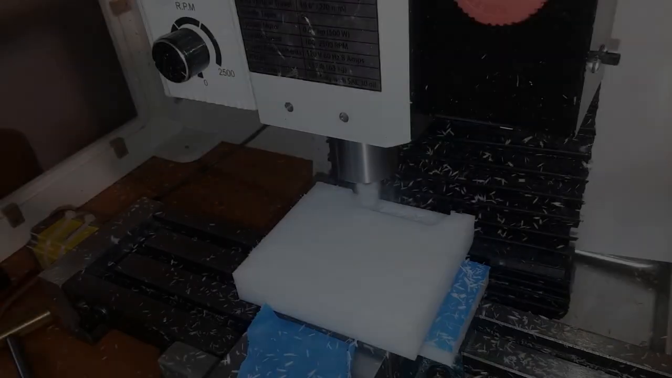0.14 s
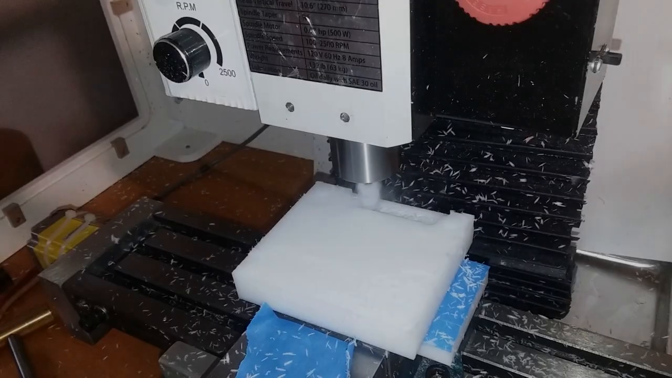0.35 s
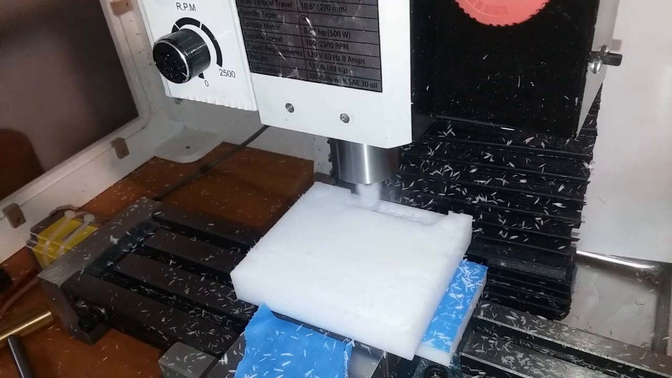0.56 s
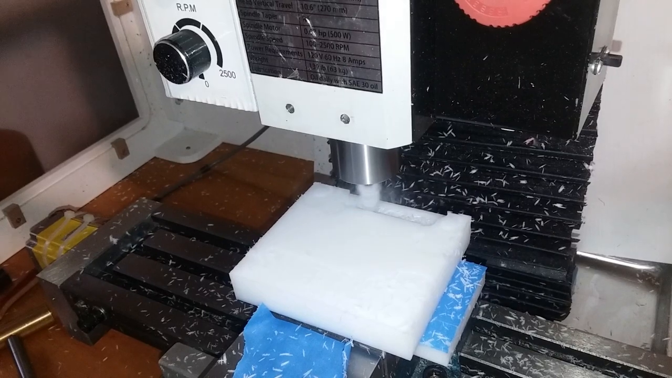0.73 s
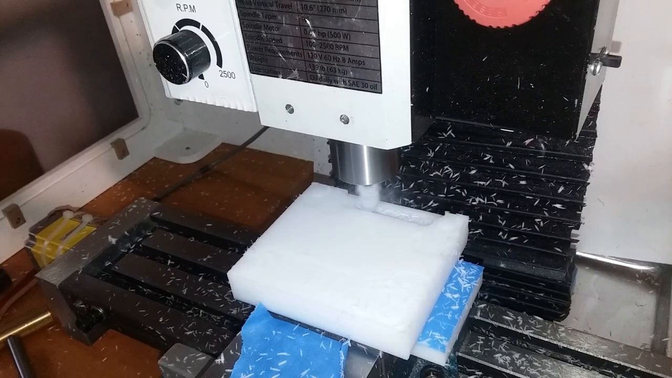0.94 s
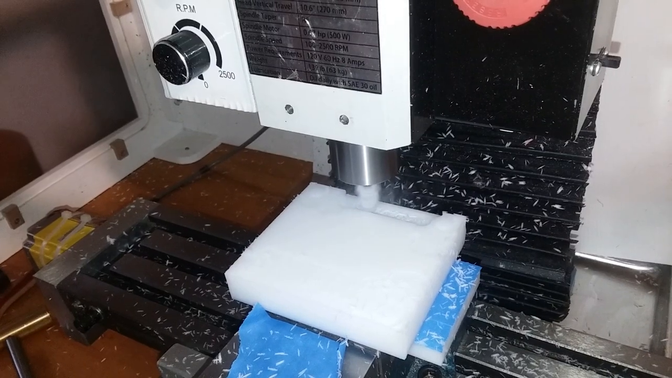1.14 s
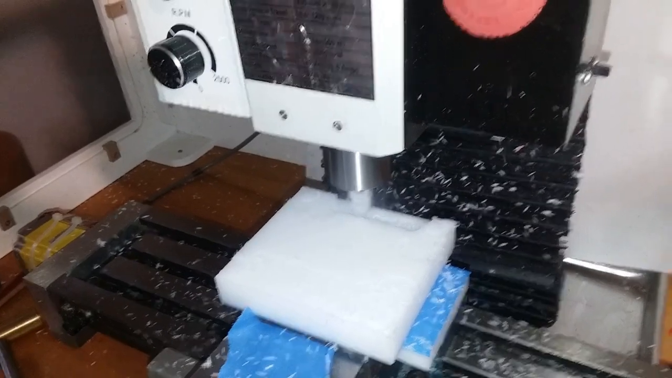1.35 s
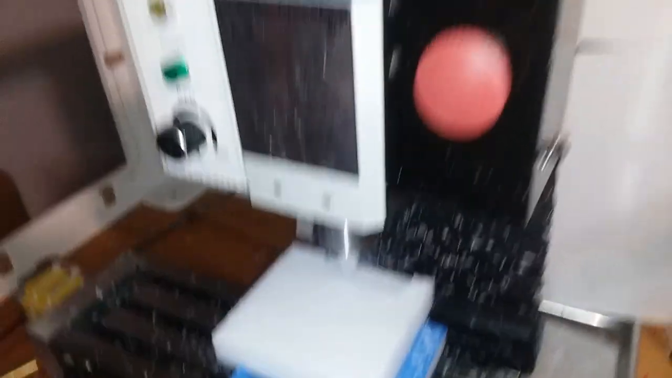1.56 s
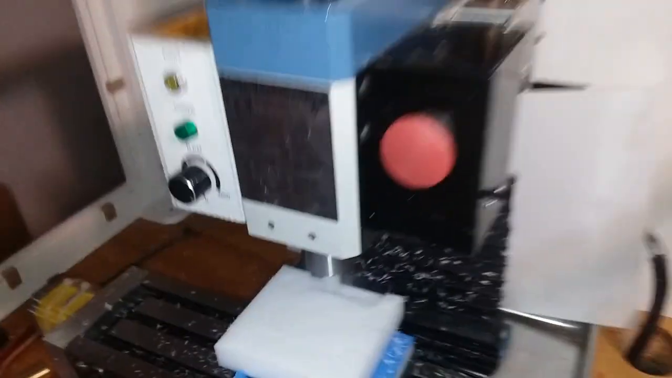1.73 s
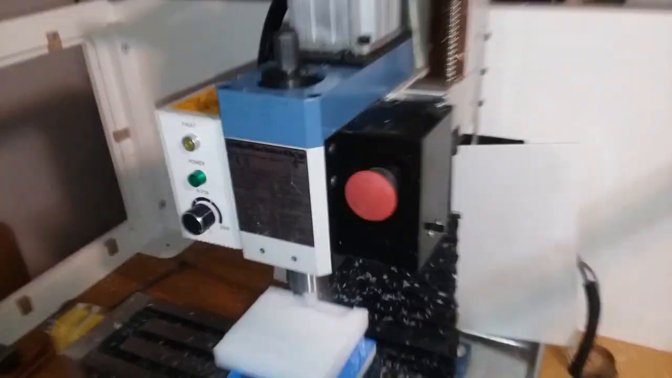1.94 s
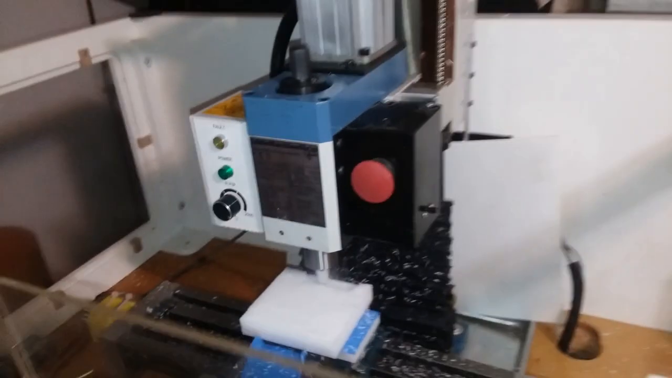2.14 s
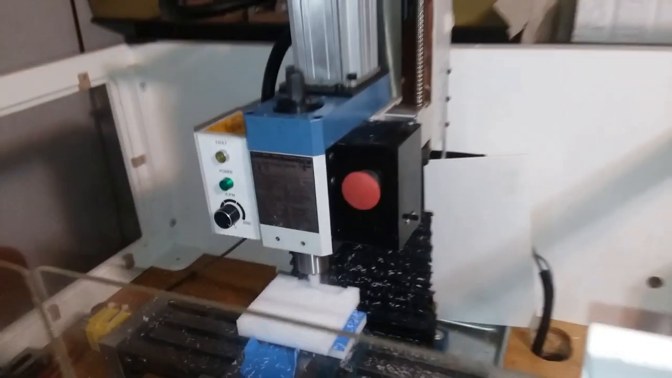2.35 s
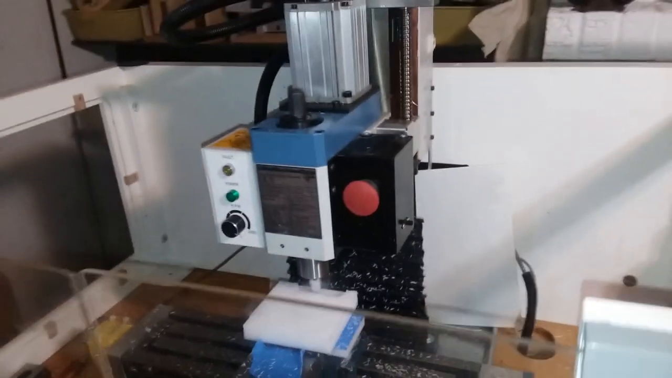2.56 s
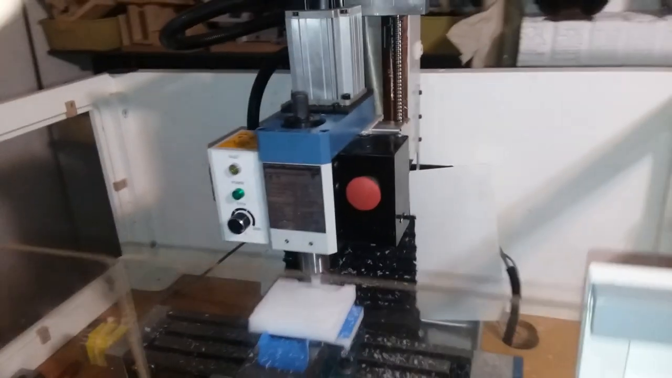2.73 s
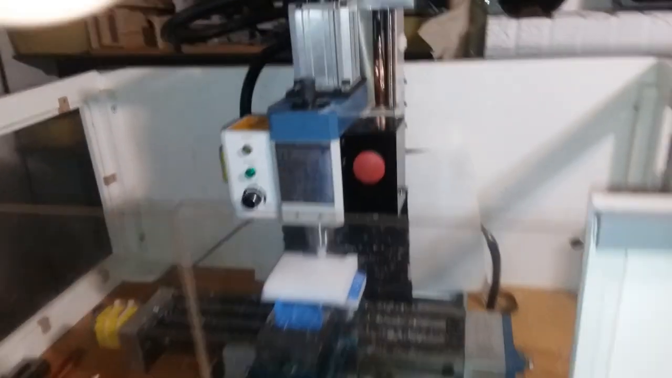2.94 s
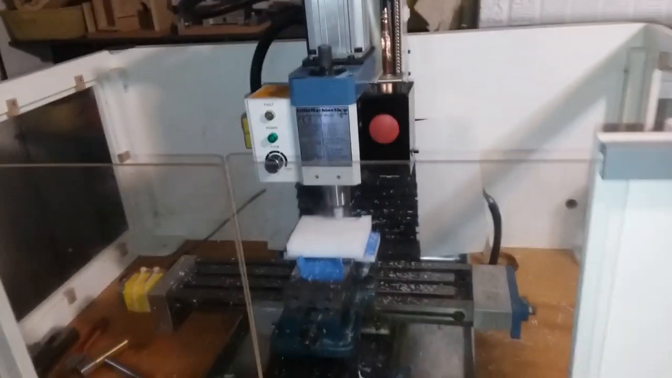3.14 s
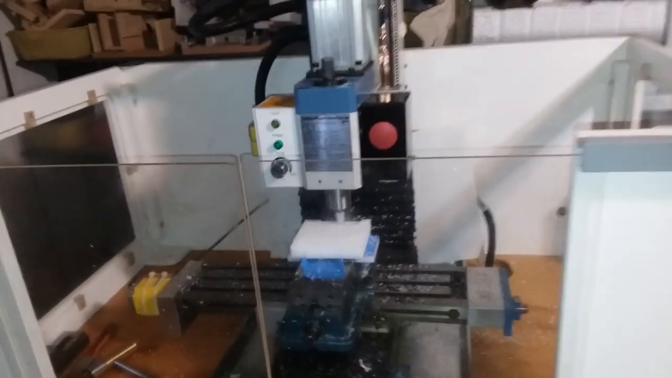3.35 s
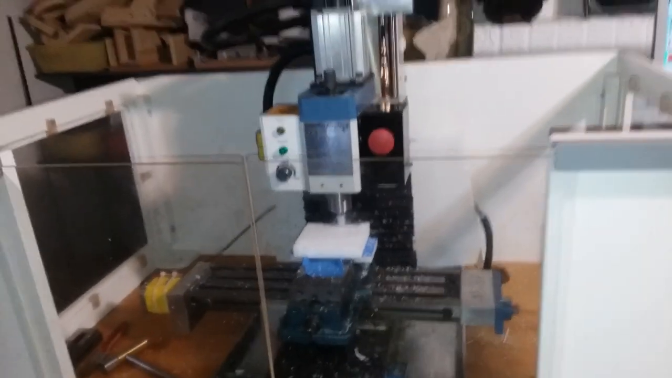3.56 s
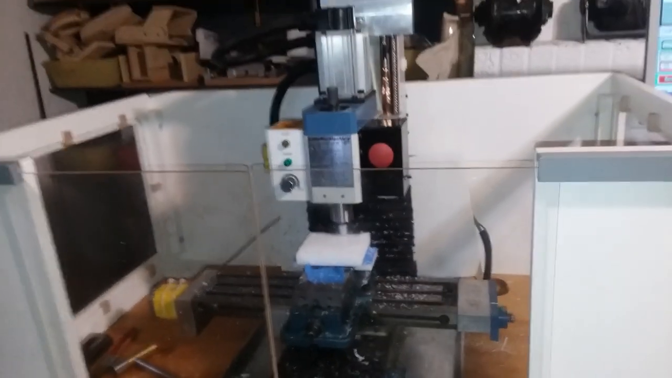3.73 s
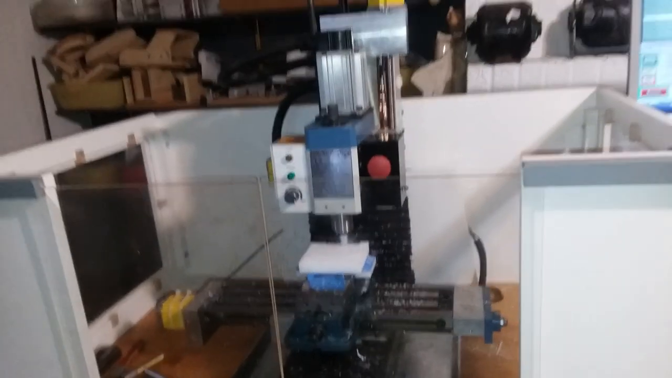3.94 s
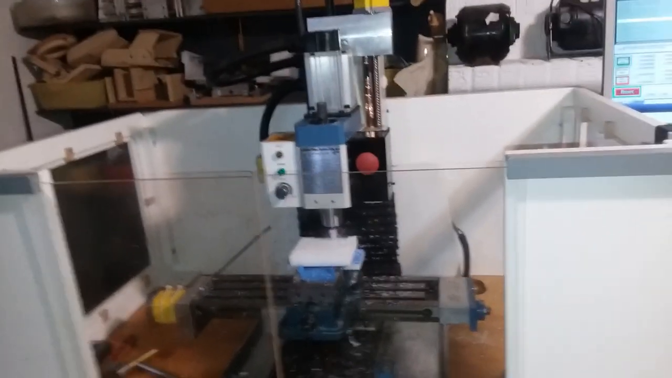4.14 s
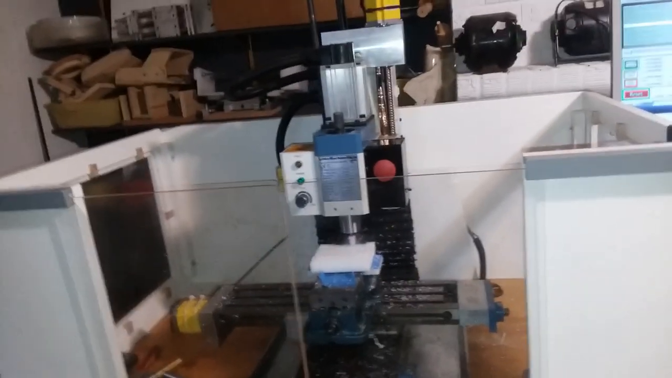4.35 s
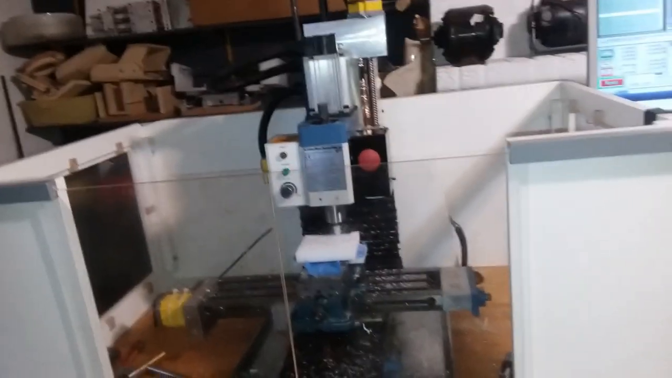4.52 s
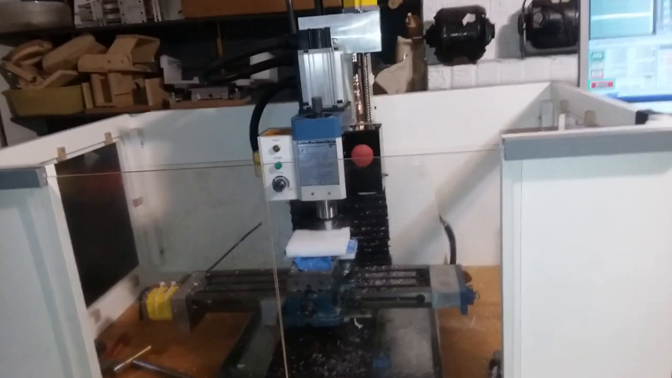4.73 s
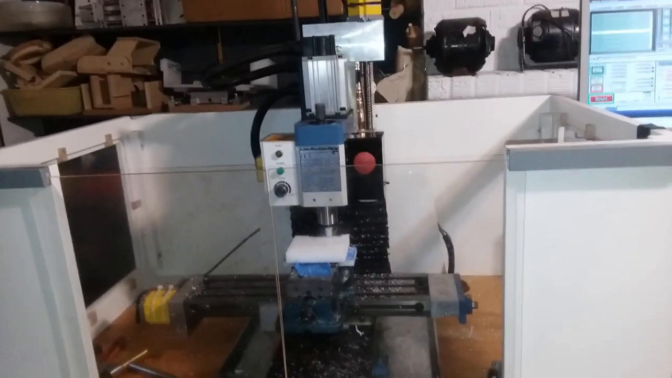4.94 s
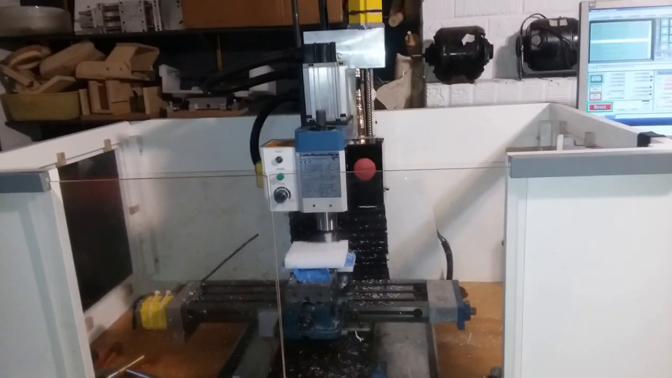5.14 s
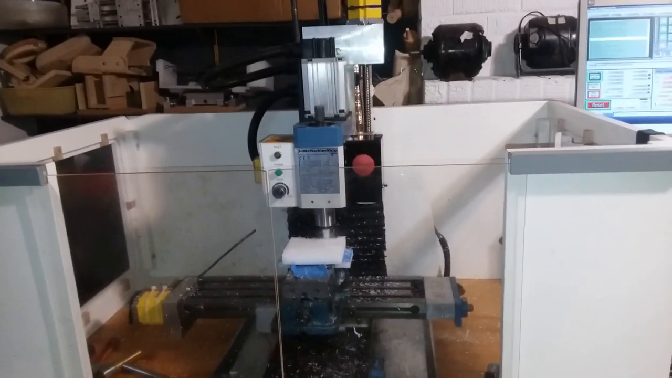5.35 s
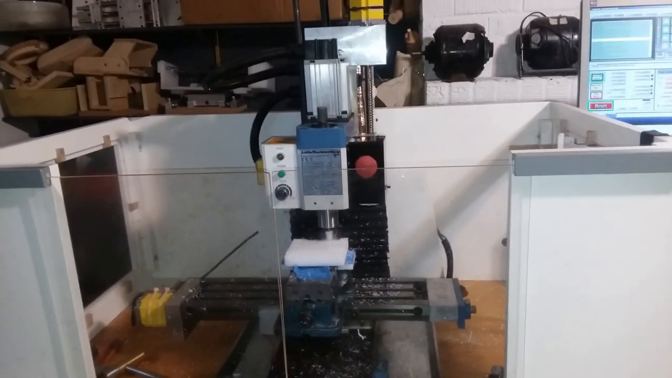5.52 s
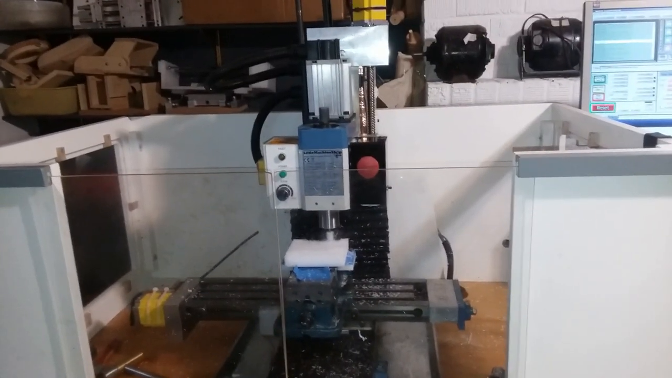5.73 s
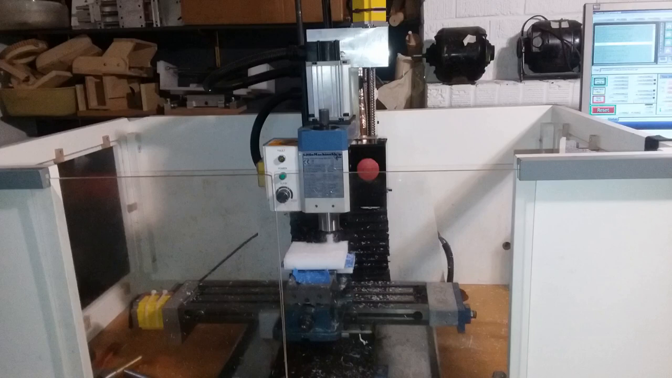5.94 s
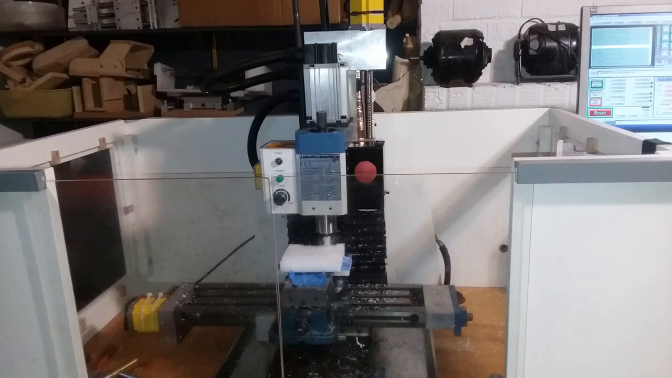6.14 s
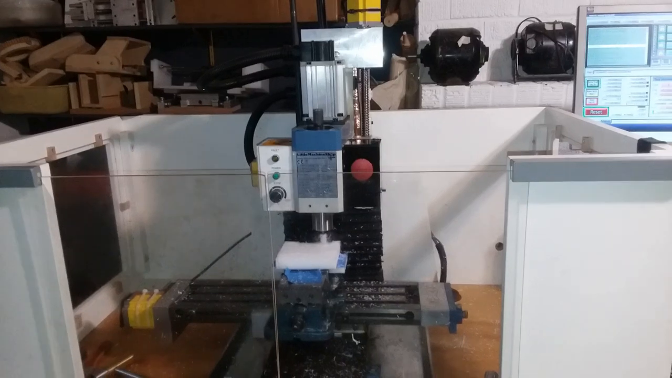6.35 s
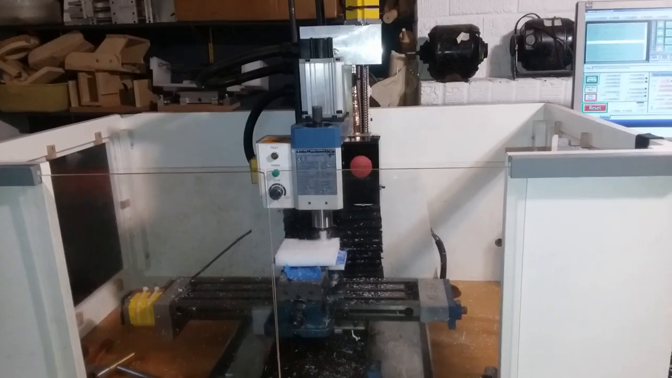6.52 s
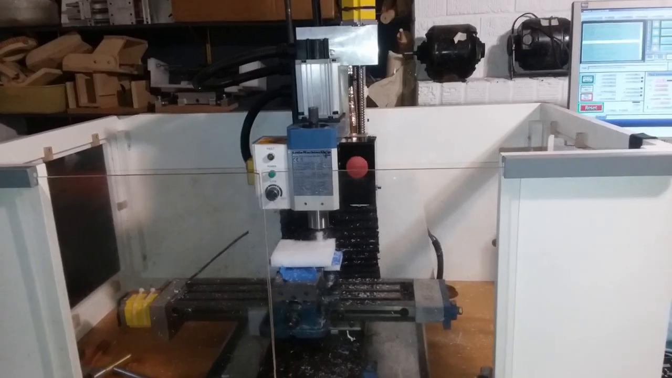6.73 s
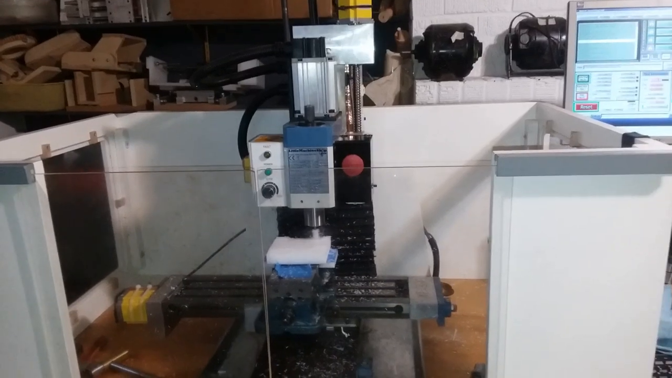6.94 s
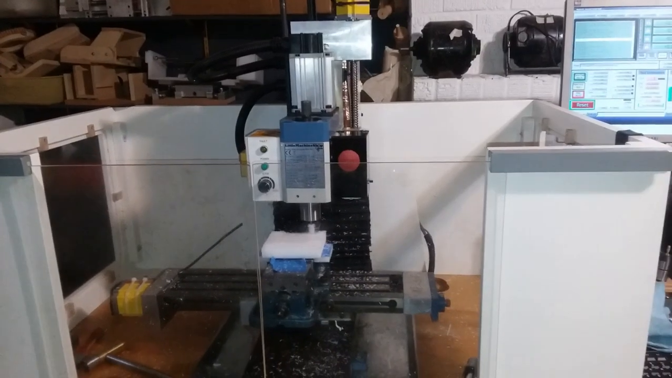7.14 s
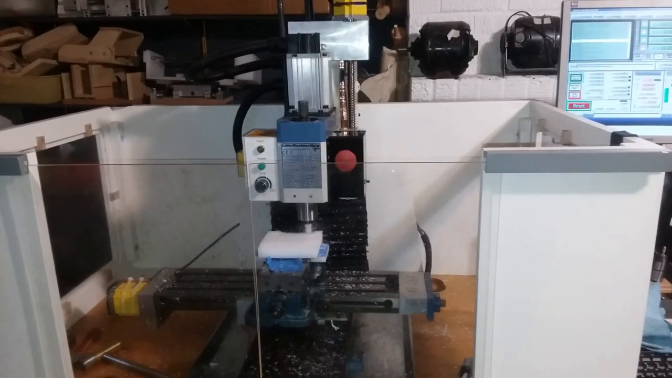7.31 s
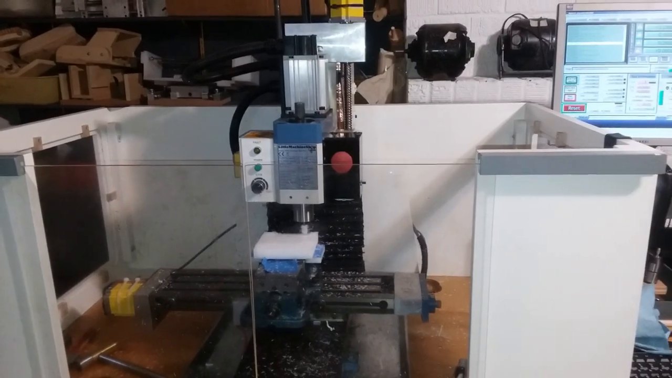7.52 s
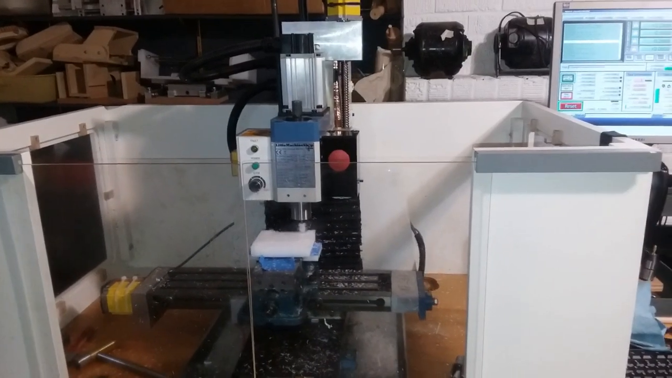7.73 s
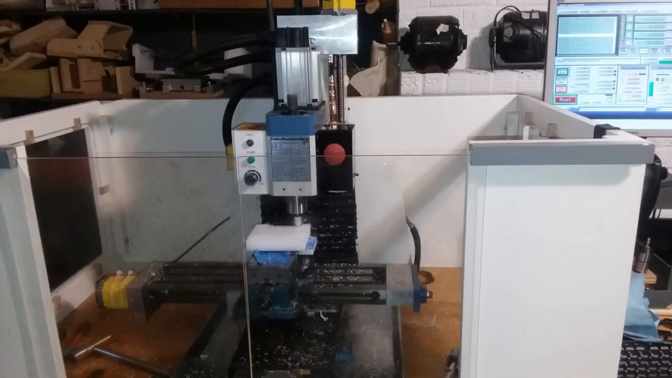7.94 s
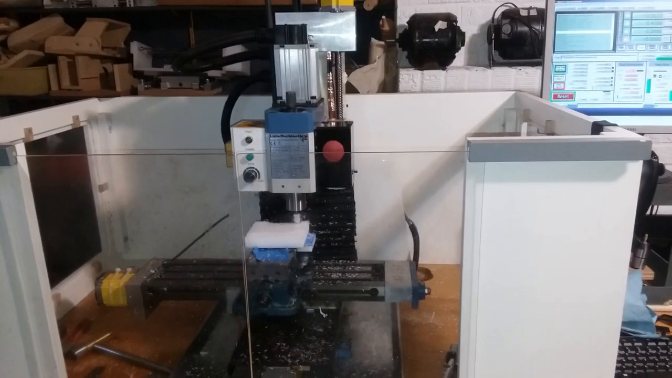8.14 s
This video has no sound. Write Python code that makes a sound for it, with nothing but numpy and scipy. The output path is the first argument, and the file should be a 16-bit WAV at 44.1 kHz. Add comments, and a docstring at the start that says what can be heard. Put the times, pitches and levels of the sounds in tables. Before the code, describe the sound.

A benchtop mill runs without a pause in a workshop, its motor whine constant in pitch with only a tiny waver. It begins close, strong and raspy, with hissing cutter noise. As the wide stereo microphone retreats past the enclosure, individual overtones swell and fade, and everything becomes thinner and softer. A very high faint electronic whistle persists, and the last second gains deep frame rumble.

```python
"""The geared motor of a benchtop milling machine whines as the machine cuts plastic.
Its whine is a series of multiples of one pitch; the spindle hums at 2500 rpm from the same turning angle.
Gear tones and shaped noise add rumble, rasp and hiss, and the drive electronics whistle very high.
The microphone starts beside the cutter, then backs out of the enclosure; near the end the hum swells."""
import sys
import numpy as np
from scipy import signal
from scipy.fft import rfft, irfft, next_fast_len
from scipy.io import wavfile
from scipy.ndimage import map_coordinates

SR = 44100
rng = np.random.default_rng(int(sys.argv[2]) if len(sys.argv) > 2 else 0)


def int16_out(signal):
    """Quantize to a 16-bit WAV file."""
    q = np.round(np.clip(np.atleast_2d(signal).T, -1, 1) * 32767)
    wavfile.write(sys.argv[1], SR, q.astype(np.int16))


N = 360736

# Levels in the tables come before the small trims added in the functions.
# "Cutter, door, room" are the microphone's three places, numbered 0, 1, 2.

# set motor speed, sagging a little as the cut goes on: t/s, f/Hz
SET_SPEED = [(0, 264.7), (4.5, 264.7), (8.18, 264.0)]
# the speed controller hunts: swings a second, swing either way, and typical size of an irregular wander
HUNT_PER_S, HUNT_HZ, WANDER_HZ = 1.98, 0.45, 0.35
# spindle turns for each cycle of the whine's base pitch
SPINDLE_SHARE = 41.68 / 264.4
# microphone path: t/s, place (beyond 0 or 2 the tone levels stay put)
MIC_PATH = [(0, 0), (1.4, -0.26), (1.8, 0.64), (2.2, 0.7), (3.4, 1.18), (3.8, 1.7), (4.5, 2.5),
            (8.18, 2.03)]
# clear whines: multiple, level/dB at cutter, door, room, t/s of one standing-wave node,
# time from node to node/s, share of the lean (0-1)
CLEAR_WHINES = [(3, -44.5, -48, -45.5, 3.17, 2.3, 0.07), (4, -40, -45.5, -52.5, 2.32, 0.67, 0.16),
                (5, -24.5, -30, -32.5, 2.23, 0.57, 0.8), (7, -19.7, -29, -38, 1.82, 0.586, 0.46),
                (8, -30.5, -29.5, -35, 2.15, .43, 0.8), (10, -30, -32, -34.5, 2.33, 1.35, .75),
                (12, -36.5, -50.5, -42, 2.67, 1.9, 1), (14, -37, -45, -43.5, 2.44, 1.6, 1)]
# weaker whines: multiple, level/dB at cutter, door, room
WEAK_WHINES = [(2, -49.5, -55.4, -53.8), (6, -36.4, -44.2, -45.4), (9, -32.6, -35.9, -40.1),
               (11, -51.6, -59.3, -56.1), (13, -51.9, -59.5, -57.1), (15, -40.7, -51.0, -48.9),
               (16, -46.2, -55.4, -50.5), (17, -46.5, -52.9, -52.3), (19, -48.3, -57.3, -55.8),
               (20, -50.8, -59.2, -60.6), (21, -47.6, -55.5, -62.2)]
# pull of the clear whines to the left (negative: right): t/s, strength (squashed later, not dB)
WHINE_LEAN = [(0, -1), (1.7, -4), (2.6, -2), (3.2, 13), (5, 11), (6.7, 13), (8.18, 5)]
# the walk backwards crosses the enclosure's standing waves: t/s, depth of their pattern (0-1)
STANDING_DEPTH = [(1.45, 0), (1.8, 0.7), (2.4, 0.5), (3.3, 0.17), (4.4, 0), (4.8, 0.06)]
# spots on the way where one whine rings out: t/s of the middle, multiple,
# time from the middle until the gain has shrunk to 37 percent/s, gain/dB
WHINE_SWELLS = [(1.787, 10, 0.093, 5.5), (1.81, 12, 0.1, 11), (1.914, 5, 0.031, 0), (2.95, 10, 0.21, 0.5),
                (3.3, 7, 0.17, 5), (3.755, 10, 0.048, 11), (4.1, 4, 0.41, 12), (4.226, 10, 0.087, 7),
                (4.472, 10, 0.048, 7.5), (4.9, 12, .18, 8), (7.3, 12, .2, 6.5)]
# random fading of the clear whines: depth at cutter, door, room
WHINE_FADE = [.13, .3, .5]
# load on the spindle: t/s, load (0 free, 1 full)
SPINDLE_LOAD = [(0, 0), (7.33, 0), (7.45, 0.84), (7.9, 1.08), (8.05, 0.6), (8.18, 1)]
# spindle hum: multiple, level/dB at cutter, door, room, level/dB under load
SPINDLE_HUM = [(1, -65.6, -69.3, -69.8, -70.8), (2, -49.6, -45.8, -42.4, -39.0),
               (3, -35.2, -54.1, -51.3, -49.3), (4, -52.0, -48.6, -54.3, -38.1),
               (5, -43.0, -53.0, -67.5, -50.1), (6, -51.0, -47.6, -50.3, -42.4),
               (7, -46.3, -41.0, -49.1, -62.6), (8, -49.6, -53.9, -52.8, -49.6),
               (9, -49.7, -49.2, -53.5, -56.9), (12, -55.2, -64.9, -62.7, -50.7)]
# gear and bearing tones: f/Hz at mean motor speed, level/dB at cutter, door, room
GEAR_TONES = [(100, -50.9, -59.8, -53.2), (225, -41.5, -56.7, -68.7), (548, -51.2, -57.7, -52.6),
              (602, -54.6, -49.1, -52.0), (880, -48.8, -59.6, -53.2), (999, -51.2, -59.0, -52.6),
              (1161, -48.2, -45.5, -53.9), (1229, -42.3, -42.4, -64.2), (1281, -43.2, -44.2, -44.1),
              (1357, -34.6, -31.8, -35.0), (1406, -39.7, -45.1, -39.8), (1498, -39.2, -44.9, -39.1),
              (1550, -49.3, -46.9, -47.9), (1624, -31.2, -32.4, -46.1), (1665, -32.4, -36.7, -41.8),
              (1688, -33.1, -41.9, -36.4), (1736, -40.4, -41.1, -47.1), (1937, -30.3, -39.0, -46.7),
              (1975, -36.3, -45.3, -50.4), (2016, -43.4, -44.2, -53.9), (2074, -40.0, -41.9, -42.1),
              (2227, -40.3, -49.5, -46.3), (2340, -45.6, -41.9, -42.0), (2422, -39.1, -42.8, -56.4),
              (2516, -41.8, -46.7, -42.0), (2709, -39.1, -45.1, -45.9), (3132, -45.5, -56.6, -48.9),
              (3205, -38.8, -52.0, -43.1), (3392, -49.9, -50.6, -47.7), (3480, -44.0, -50.5, -49.4),
              (4455, -44.1, -55.6, -52.7), (4540, -45.1, -55.7, -50.6)]
# friction noise as the microphone backs out past the guard: t/s, gear rasp level/dB, cutter hiss level/dB
NOISE_LEVELS = [(0, -22.9, -34), (1.55, -21.5, -34.5), (2.2, -26, -40.5), (2.8, -30.5, -41),
                (3.15, -26, -44), (3.7, -27, -42), (4.5, -27, -44.6), (8.18, -27.5, -45)]
# frame rumble: level/dB at cutter, door, room
RUMBLE_LEVELS = [-35, -39, -40]
# noise colours, where only the shape counts: f/Hz, relative level/dB at cutter, in the room
RUMBLE_COLOUR = [(20, -88, -95), (60, -72.5, -79.5), (150, -59, -67), (215, -59, -70.5), (275, -65.5, -64),
                 (382, -66.5, -69.5), (460, -68, -78.5), (540, -68.5, -76.5), (950, -70, -75.5),
                 (1310, -67, -88), (2500, -120, -120)]
RASP_COLOUR = [(740, -100, -100), (1172, -62.5, -74.5), (1426, -55.5, -62.5), (1680, -57, -57.5),
               (1980, -46, -63.5), (2400, -64, -65), (2750, -57, -65), (2540, -70, -88), (2945, -67.5, -71),
               (3230, -62, -68), (4060, -67.5, -74), (5200, -115, -85.5), (9000, -120, -120)]
HISS_COLOUR = [(2510, -110, -110), (4460, -69.5, -83.5), (4940, -67.5, -79), (7170, -71.5, -77),
               (9000, -85, -91.5), (10840, -82.5, -88), (11000, -78.5, -86), (15500, -80, -91)]
# colour of the frame's rumble under load, where only the shape counts: f/Hz, relative level/dB
SHUDDER_COLOUR = [(20, -55), (40, -30), (85, 4), (115, -4), (260, 2), (410, -18), (540, -2), (680, -13),
                  (1100, -18), (2500, -70)]
# strength of that rumble: t/s, level/dB
SHUDDER_LEVELS = [(0, -88), (7.2, -68), (7.6, -46), (7.95, -36), (8.18, -34)]
# switching whistles of the drives: t/s, level/dB of each
WHISTLE_LEVELS = [(0, -54.5), (1.5, -51), (2.8, -49), (4.2, -60), (6.0, -55), (7.2, -55), (8.0, -50)]
# stereo width: f/Hz, side minus mid level/dB (tones add an offset)
STEREO_WIDTH = [(30, -10), (80, -19), (250, -10.5), (600, -8.5), (1300, -0.5), (2200, -1.5), (6000, 0),
                (15000, 0.5)]

TOP_HZ = 15740  # upper limit of the sound
HOP = 88  # samples between two points of a slow control


def motor(phase):
    """The whine series; eight of its multiples ring clearly in the gear head."""
    lean, = curves(WHINE_LEAN)
    fade = at_place(WHINE_FADE)
    # beside the cutter the direct sound of the lower multiples outweighs their reflections
    low_echo_db, high_echo_db = at_place([-8, 1.5, 1.5]), 2
    whine = 0
    for k, *db, node_s, spacing_s, share in CLEAR_WHINES:
        level_db = at_place(db) + standing_db(node_s, spacing_s) + swell_db(k) - 0.4
        echo_db = low_echo_db if k < 8 else high_echo_db
        # tooth errors roughen the higher multiples more
        whine = whine + tone(k * phase, k * 264, level_db, rough=0.025 * k, fade=fade,
                             lean=share * lean, echo_db=echo_db)
    for k, *db in WEAK_WHINES:
        whine = whine + tone(k * phase, k * 264, at_place(db) + 0.074, rough=0.41, fade=0.34)
    return whine


def speed():
    """Motor speed in Hz: the controller hunts about its setting."""
    hunt = HUNT_HZ * np.cos(2 * np.pi * HUNT_PER_S * ticks())
    return curves(SET_SPEED)[0] + hunt + WANDER_HZ * wobble(7)


def standing_db(node_s, spacing_s):
    """A whine dips and swells as the moving microphone crosses its nodes."""
    depth, = curves(STANDING_DEPTH)
    reflection = depth * np.exp(2j * np.pi * (ticks() - node_s) / spacing_s)
    return 20 * np.log10(np.abs(1 - reflection) / np.hypot(1, depth))


def swell_db(multiple):
    """The smooth swells of one whine, each a bell-shaped gain in time."""
    return sum(db * np.exp(-((ticks() - middle_s) / spread_s) ** 2)
               for middle_s, k, spread_s, db in WHINE_SWELLS if k == multiple)


def spindle(phase):
    """Once-a-turn forces of the cutter hum in the frame; load changes the balance of the multiples."""
    load, = curves(SPINDLE_LOAD)
    hum = 0
    for k, *db, loaded_db in SPINDLE_HUM:
        level_db = at_place(db) * (1 - load) + loaded_db * load - 0.3
        hum = hum + tone(k * phase, k * 42, level_db, rough=0.059, fade=0.089, lean=-0.5)
    return hum


def gears(phase):
    """Gear sidebands and bearing tones follow the motor's speed."""
    mean_hz = 264.4
    return sum(tone(hz / mean_hz * phase, hz, at_place(db) + 0.23, rough=0.65, fade=0.5, echo_db=4.5)
               for hz, *db in GEAR_TONES)


def friction(phase):
    """The frame rumbles, gear teeth rasp, and the cutter hisses; rasp and hiss pulse faintly once a turn."""
    rasp_db, hiss_db = curves(NOISE_LEVELS)
    turns = phase * SPINDLE_SHARE / (2 * np.pi)
    pulse = np.cos(2 * np.pi * turns)
    rumble_gain = fast(amp(at_place(RUMBLE_LEVELS) - 0.45 + 0.58 * wobble(8)))
    rumble = rumble_gain * rush(RUMBLE_COLOUR, turns, memory=0.22, ripple_db=1.0)
    # the teeth's noise repeats from turn to turn more closely than the chips' hiss
    rasp_gain = fast(amp(rasp_db - 1.3 + 0.56 * wobble(9)))
    rasp = rasp_gain * rush(RASP_COLOUR, turns, memory=0.42, ripple_db=3.5) * (1 + 0.037 * pulse)
    hiss_gain = fast(amp(hiss_db + 2.0 + 0.25 * wobble(14)))
    hiss = hiss_gain * rush(HISS_COLOUR, turns, memory=0.28, ripple_db=3.1)
    # the hiss also pulses with the motor's base pitch
    hiss = hiss * (1 + 0.036 * pulse + 0.05 * np.cos(phase))
    return rumble + rasp + hiss


def shudder():
    """The frame and enclosure rumble as the load builds: noise with a fixed colour and a rising level."""
    level_db, = curves(SHUDDER_LEVELS)

    def colour(f):
        mid_and_side = np.array([np.ones_like(f), amp(along(STEREO_WIDTH, f))])
        return amp(along(SHUDDER_COLOUR, f)) * mid_and_side

    pair = filtered(rng.standard_normal((2, N)), colour)
    return fast(amp(level_db)) * pair / pair[0].std()


def drives():
    """Two switching circuits whistle at slightly drifting pitches."""
    pitches_hz = (15320, 15654)
    level_db = curves(WHISTLE_LEVELS)[0] + 1.2 * wobble(6)
    return sum(tone(angle_of(hz + 3 * wobble(1.2)), hz, level_db, rough=0.05, fade=0.35)
               for hz in pitches_hz)


def tone(phase, hz, db, rough, fade, lean=0, echo_db=0):
    """Mid and side of one machine tone: fast flutter roughens it, reflections fade each differently."""
    mid = (1 + fade * flutter(7) + rough * flutter(55)) / np.sqrt(1 + fade ** 2 + rough ** 2)
    # the echo sits about a quarter cycle off the direct sound
    quarter = 1j * rng.choice([-1, 1]) * np.exp(0.5j * wobble(1.0))
    echo = unit(quarter + 0.5 * flutter(5) + rough * flutter(55))
    side = amp(along(STEREO_WIDTH, hz) + echo_db - 4.0) * echo + np.tanh(lean / 9) * mid
    angle = ((phase + rng.uniform(0, 2 * np.pi)) % (2 * np.pi)).astype(np.float32)
    cos, sin = np.cos(angle), np.sin(angle)
    # a sine's peak is root 2 times its average (rms) level
    strengths = np.sqrt(2) * amp(db) * np.array([mid, side])
    return np.array([fast(z.real) * cos - fast(z.imag) * sin for z in strengths])


def rush(colours, turns, memory, ripple_db):
    """Mid and side machine noise; its colour and ripple shift as the microphone backs away."""
    hz, near, far = np.transpose(colours)
    pair = turn_noise(turns, memory)

    def at_end(db):
        def colour(f):
            return amp(along(np.c_[hz, db], f) + ripple_db * panels(f, spacing_hz=55.3))

        x = filtered(pair, lambda f: np.array([colour(f), colour(f) * amp(along(STEREO_WIDTH, f))]))
        return x / x[0].std()

    close, distant = at_end(near), at_end(far)
    away = fast(np.clip(curves(MIC_PATH)[0] / 2.0, 0, 1))
    return close * (1 - away) + distant * away


def turn_noise(turns, memory):
    """Two noises that partly repeat from one spindle turn to the next, as the same teeth and balls meet."""
    size = round(N / turns[-1])  # samples in an average turn
    fresh = rng.standard_normal((2, int(turns[-1]) + 9, size))
    # each row is one turn and keeps a share of the row before
    rows = signal.lfilter([1], [1, -memory], fresh, axis=1)
    # start 7 turns in, so that the memory has settled
    spots = np.round((turns + 7) * size).astype(int)
    return unit(rows.reshape(2, -1)[:, spots])


def panels(hz, spacing_hz):
    """The enclosure's many reflections ripple a spectrum with random peaks and notches."""
    return map_coordinates(rng.standard_normal(4096), [hz / spacing_hz], order=1, mode="mirror")


def at_place(levels):
    """Value along the microphone's path, from the values at its three places."""
    return np.interp(curves(MIC_PATH)[0], np.arange(3), levels)


def angle_of(hz):
    """Running phase angle of a slow frequency curve, in radians."""
    return 2 * np.pi * np.cumsum(fast(hz), dtype=float) / SR


def wobble(rate):
    """A smooth random curve through rate random points a second."""
    knots = rng.standard_normal(2048)
    return unit(map_coordinates(knots, [ticks() * rate], mode="mirror"))


def flutter(rate):
    """A random change of both strength and phase."""
    return unit(wobble(rate) + 1j * wobble(rate))


def filtered(x, response):
    """Sound x with each frequency scaled by response(Hz)."""
    m = next_fast_len(N + 8192)
    return irfft(rfft(x, m) * response(np.fft.rfftfreq(m, 1 / SR)), m)[..., :N]


def ticks():
    """Times in seconds at which slow controls move, one point every HOP samples."""
    return np.arange(N // HOP + 2) * HOP / SR


def curves(rows):
    """One slow curve for each column after the time."""
    s, *cols = np.transpose(rows)
    return [np.interp(ticks(), s, c) for c in cols]


def fast(slow):
    """A slow curve joined by straight lines at the sample rate."""
    slow = slow.astype(np.float32)
    ramp = np.arange(HOP, dtype=np.float32) / HOP
    return (slow[:-1, None] + np.diff(slow)[:, None] * ramp).ravel()[:N]


def along(points, hz):
    """Read a table of (f/Hz, value) points at hz, on a log frequency axis."""
    f, v = np.transpose(points)
    return np.interp(np.log(hz + 1), np.log(f + 1), v)


def amp(db):
    """Decibels to a plain gain."""
    return 10 ** (np.asarray(db) / 20)


def unit(x):
    """Scale x to an average (rms) strength of 1."""
    return x / np.sqrt(np.mean(np.abs(x) ** 2) + 1e-20)


def scene():
    """One shaft angle drives every turning part; mid and side become left and right."""
    phase = angle_of(speed())
    turning = motor(phase) + spindle(phase * SPINDLE_SHARE) + gears(phase) + friction(phase)
    mid, side = turning + shudder() + drives()
    return np.array([mid + side, mid - side])


def record(dry):
    """A sharp band limit removes everything from TOP_HZ upwards."""
    return filtered(dry, lambda hz: hz < TOP_HZ)


dry = scene()
out = record(dry)
int16_out(out)
```